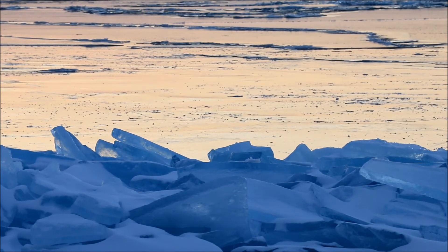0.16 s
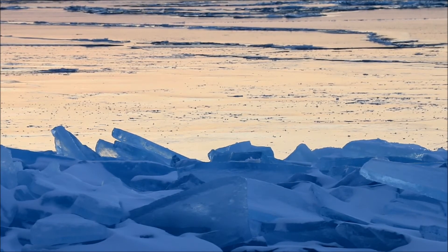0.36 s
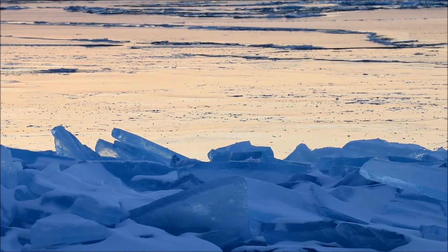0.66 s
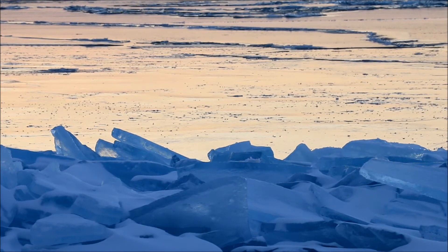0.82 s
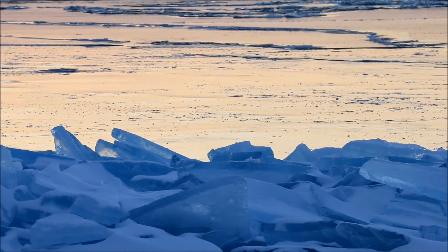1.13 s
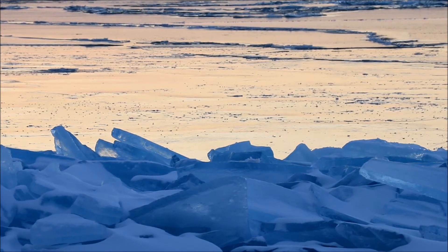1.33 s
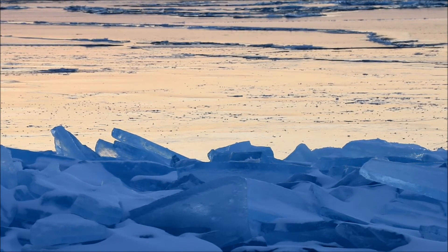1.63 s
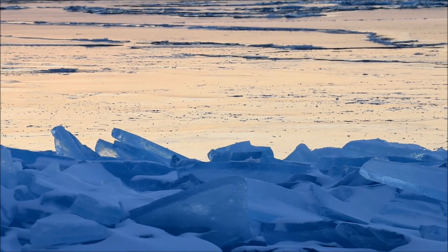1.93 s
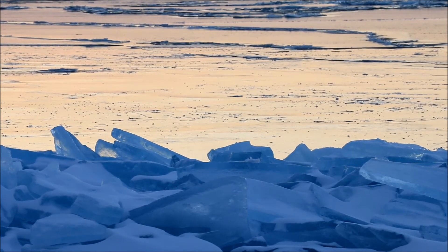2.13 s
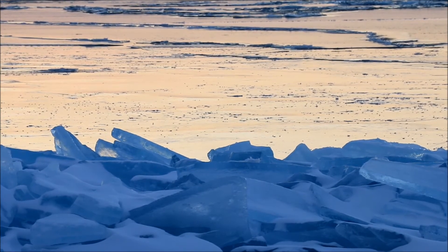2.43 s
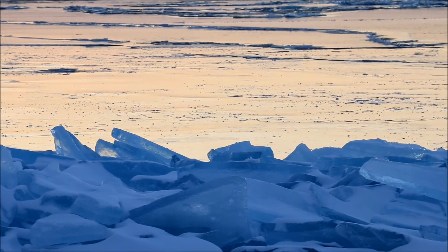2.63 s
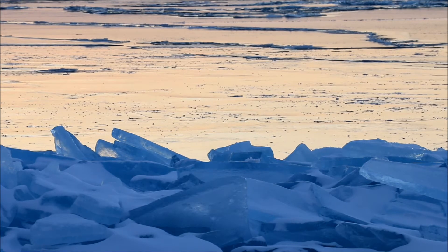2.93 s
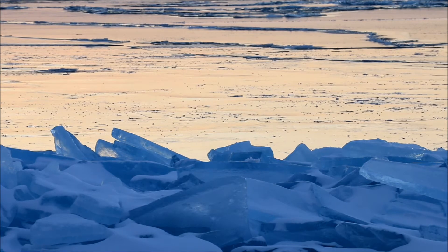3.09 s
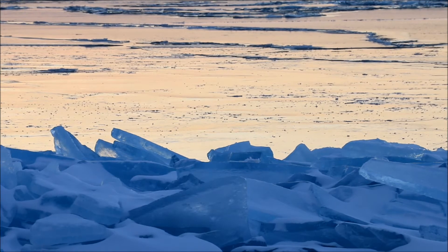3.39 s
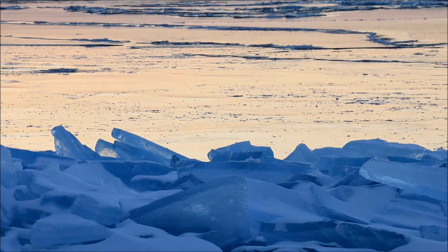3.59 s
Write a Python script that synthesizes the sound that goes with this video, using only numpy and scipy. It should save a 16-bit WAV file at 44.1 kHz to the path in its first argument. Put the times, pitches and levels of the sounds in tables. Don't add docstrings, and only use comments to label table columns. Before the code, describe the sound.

Ice plates grind, moan, knock and tick on a frozen shore under low buffeting wind.

```python
import sys
import numpy as np
from scipy import signal
from scipy.io import wavfile
from scipy.ndimage import uniform_filter1d

SR = 44100
rng = np.random.default_rng(int(sys.argv[2]) if len(sys.argv) > 2 else 0)


def dump_mix(stems):
    frames = np.atleast_2d(stems).T
    limited = np.clip(frames, -1, 1)
    pcm = np.round(limited * 32767).astype(np.int16)
    wavfile.write(sys.argv[1], SR, pcm)


def linear_from_db(decibels):
    return 10 ** (np.asarray(decibels, float) / 20)


N = 165375


def evened(x):
    return x / np.sqrt(np.mean(x ** 2) + 1e-20)


def read(points, hz):
    f, value = np.transpose(points)
    return np.interp(np.log(hz + 1), np.log(f + 1), value)


def curve(rows, column):
    rows = np.array(rows)
    return np.interp(np.arange(N) / SR, rows[:, 0], rows[:, column])


def add(mix, s, sound):
    part = mix[max(round(s * SR), 0):][:len(sound)]
    part += sound[:len(part)]


def resonate(x, hz, width_hz):
    turn = np.exp(2j * np.pi * np.cumsum(hz * np.ones(len(x))) / SR)
    r = np.exp(-np.pi * width_hz / SR)
    return 2 * (turn * signal.lfilter([1 - r], [1, -r], x / turn)).real


def noise(colour, same, patchy_db, size):
    frames, hz = 4 * N // size + 5, np.fft.rfftfreq(size, 1 / SR)
    a, b, c, d, patches = rng.standard_normal((frames, len(hz), 5)).T
    patches = uniform_filter1d(patches, size=10, axis=0)
    patches = evened(uniform_filter1d(patches, size=8, axis=1))
    same = np.clip(read(same, hz), -1, 1)[:, None]
    left, other = a + 1j * b, c + 1j * d
    right = same * left + np.sqrt(1 - same ** 2) * other
    z = np.array([left, right]) * linear_from_db(read(colour, hz)[:, None] + patchy_db * patches)
    return evened(signal.istft(z, nperseg=size, noverlap=3 * size // 4)[1][:, :N])


def ring(hz, t60, rise_s):
    t = np.arange(SR // 4) / SR
    rise = 1 - np.exp(-t / max(rise_s, 1e-5))
    return rise * linear_from_db(-60 * t / max(t60, .002)) * np.sin(2 * np.pi * hz * t)


def burst(t60, low_hz, high_hz):
    t = np.arange(SR // 8) / SR
    wake = 0.15 * rng.standard_normal(len(t)) * linear_from_db(-60 * t / max(t60, .002))
    click = (t == 0)
    grit = signal.lfilter(*signal.butter(3, [low_hz, high_hz], "band", fs=SR), wake + click)
    return grit / abs(grit).max()


# frequency in Hz, level in dB per Hz.
HISS_COLOUR = [(880, -12), (1500, -6.5), (2160, -8.5), (2400, -10), (14200, -13.5), (15700, -13)]


def hiss():
    return linear_from_db(-63.5 + 7.0) * noise(HISS_COLOUR, [(100, 0), (9000, 0.0038)], patchy_db=-0.5, size=1024)


# time in seconds, strength in dB.
GUSTS = [(0.0, -47), (0.09, -46), (0.5, -49), (1.37, -46), (1.7, -43.5), (1.94, -40.5), (2.16, -42.5),
         (2.37, -41), (2.51, -48.5), (2.77, -48), (2.92, -51), (3.02, -48), (3.75, -49.5)]
# frequency in Hz, level in dB per Hz.
BUFFET_COLOUR = [(1, -40), (8, 6), (21, 9), (32, 3.5), (56, -2.5), (110, -38), (300, -140)]
# frequency in Hz, likeness from -1 to 1.
WIND_SAME = [(20, 0.12), (60, 0.66), (130, -0.056), (300, -0.22)]
# frequency in Hz, level in dB per Hz.
FLUTTER_COLOUR = [(40, -13), (70, -2), (200, -13.5), (400, -32), (1500, -140)]
# start in seconds, peak in dB, pitch in Hz, left over right in dB.
PUFFS = [(0.101, -24, 22.3, 14.5), (0.456, -19.5, 21, 11), (0.27, -28, 38, 5), (0.669, -23.5, 21.3, 4.0),
         (0.69, -27, 42, 7), (0.829, -29, 40.7, 12), (1.136, -24.5, 42.4, -5), (1.388, -21, 40.4, 7),
         (1.45, -20.5, 39.4, 6), (1.563, -10.5, 49, 6), (1.587, -17, 22.4, 10), (1.641, -18, 41.7, 6),
         (1.809, -19, 33.5, 12), (1.845, -10.5, 24.5, 6.5), (1.918, -16, 22, 7), (1.959, -19, 26.4, 6),
         (2.029, -13.5, 28.3, 3), (2.238, -14, 23.5, 8), (2.269, -14, 35.4, 7), (2.339, -15.5, 48, 6),
         (2.65, -25, 25.6, 18), (2.73, -26.5, 29.7, 10), (2.989, -22.5, 39.7, 2), (3.04, -25, 35.5, 8),
         (3.079, -31.5, 43.1, -18), (3.299, -28.5, 22.4, 12), (3.709, -24.5, 45.7, 9)]


def wind():
    gust_db = curve(GUSTS, column=1)
    deep = noise(BUFFET_COLOUR, WIND_SAME, patchy_db=2.0, size=4096)
    power = uniform_filter1d((deep ** 2).mean(0), size=6000)
    deep = deep / (power + 0.034) ** 0.67 * linear_from_db([[2.2], [-2.8]])
    flutter = noise(FLUTTER_COLOUR, WIND_SAME, patchy_db=3.0, size=2048) * linear_from_db([[.5], [-.7]])
    puffs = np.zeros((2, N))
    for s, db, hz, pan_db in PUFFS:
        t = np.arange(0, 1.93 / hz, 1 / SR)
        puff = linear_from_db(db - 7.5) * np.hanning(len(t)) * np.sin(2 * np.pi * hz * t)
        add(puffs[0], s - .01, puff * linear_from_db(pan_db / 2))
        add(puffs[1], s - .01, puff * linear_from_db(-pan_db / 2))
    deep_db = -35.0 + 0.69 * (gust_db - gust_db.mean())
    return linear_from_db(deep_db) * deep + linear_from_db(gust_db + 2.5) * flutter + puffs


# start in seconds, peak in dB, pitch in Hz.
THUMPS = [(0.674, -30, 108.6), (0.672, -33.5, 161), (0.676, -39, 237), (1.333, -37, 86), (1.56, -37, 140),
          (1.599, -31, 116), (1.707, -43, 107), (1.94, -33.5, 168), (2.07, -47, 104), (2.426, -31, 86),
          (2.558, -44, 79), (2.72, -38, 105), (2.991, -34.5, 101), (3.023, -26, 149.7), (3.04, -33, 128)]


def thumps():
    out = np.zeros(N)
    for s, db, hz in THUMPS:
        body = ring(hz, 0.16, 0.0032) + 0.38 * ring(hz * 1.507, 0.1, 0.0056)
        add(out, s, linear_from_db(db - 1.5) * body)
    return out * [[1.8], [-.6]]


# time in seconds, level in dB.
ICE_PRESSURE = [
    (0.0, -47),
    (0.36, -49),
    (0.63, -48),
    (0.75, -42.5),
    (1.14, -51),
    (2.03, -50.5),
    (2.7, -51),
    (2.84, -47),
    (3.24, -50.5),
    (3.75, -50.5),
]
# frequency in Hz, level in dB per Hz.
RUB_COLOUR = [(150, -14), (260, -8), (416, -6), (528, -2), (1030, -14), (1350, -15.5), (2390, -28.5),
              (4000, -35.5), (5200, -92), (8800, -120)]


def grind():
    rub = noise(RUB_COLOUR, [(300, 0.89), (640, 0.72), (1100, 0.77), (3000, 0.2)], patchy_db=2.0, size=1024)
    hollow = evened(resonate(rng.standard_normal(N), hz=560, width_hz=101))
    nudges_per_s, nudge_t60_s = 400, 0.082
    chance, strike, pick = rng.random((3, N))
    hits = linear_from_db(-4.5 * np.log(chance + 0.04)) * (strike < nudges_per_s / SR)
    which = (pick * 12).astype(int)
    nudges = np.zeros(N)
    for k, hz in enumerate(np.geomspace(380, 1500, num=12)):
        tap = ring(hz, nudge_t60_s * 500 / hz, 0.00027) * 500 / hz
        nudges += signal.oaconvolve(hits * (which == k), tap)[:N]
    db = curve(ICE_PRESSURE, column=1)
    rub_db = -0.5 + db.mean() + 0.54 * (db - db.mean())
    return linear_from_db(rub_db) * rub + linear_from_db(db - 8.5) * hollow + linear_from_db(db - 13) * evened(nudges)


# time in seconds, level in dB, pitch in Hz.
MOAN_NOTE = [
    (0., -43.5, 592),
    (.16, -58, 645),
    (.3, -50, 639),
    (.42, -48, 626),
    (.49, -51.5, 599),
    (.6, -38.5, 601),
    (.71, -56, 585),
    (.76, -45.5, 527),
    (.82, -46, 516),
]


def moan():
    hz, t, width_hz = curve(MOAN_NOTE, column=2), np.arange(N) / SR, 21
    note = resonate(rng.standard_normal(N), hz, width_hz)
    note = resonate(note, hz, 2.0 * width_hz)
    note = note / (uniform_filter1d(evened(note) ** 2, size=600) + 0.046) ** 0.35
    slip_db = 1.9 * evened(uniform_filter1d(rng.standard_normal(N), size=1500))
    rest_db = -180 * np.maximum(t - MOAN_NOTE[-1][0], 0)
    return linear_from_db(curve(MOAN_NOTE, column=1) - 4 + slip_db + rest_db) * evened(note)


# middle in seconds, length in seconds, level in dB, pitch in Hz, width in Hz.
SCRAPES = [(.005, 0.014, -45, 860, 880), (0.64, .1, -50, 551, 25), (0.788, 0.04, -54.5, 1720, 400),
           (0.858, 0.044, -45, 642, 69.6), (1.022, 0.094, -48, 625, 70), (1.168, 0.045, -44.5, 630, 60.3),
           (1.578, 0.05, -46, 745, 160), (1.654, .05, -52, 690, 200), (1.679, 0.11, -50.5, 374, 200),
           (2.384, 0.12, -50, 362, 200), (2.315, 0.062, -58, 1510, 500), (2.382, 0.098, -52.5, 670, 490),
           (2.732, .015, -44.5, 720, 502), (2.825, 0.047, -47.5, 503, 120), (2.83, 0.022, -50, 950, 200),
           (1.871, 0.052, -51, 584, 80), (2.892, 0.069, -49.5, 425, 60), (2.938, 0.099, -49, 720, 300),
           (2.971, 0.26, -60, 1640, 500)]


def scrapes():
    out = np.zeros(N)
    for s, length, db, hz, width_hz in SCRAPES:
        n = round(2 * length * SR)
        grain, grip = rng.standard_normal((2, n + 2000))
        rough = grain * linear_from_db(2.6 * evened(uniform_filter1d(grip, size=200)))
        slide = resonate(resonate(rough, hz, width_hz), hz, width_hz)
        slide = evened(slide[-n:])
        slide = evened(slide / (uniform_filter1d(slide ** 2, size=500) + .1) ** 0.35)
        add(out, s - length, linear_from_db(db) * np.hanning(n) * slide)
    return out


# start in seconds, peak in dB, click colour in Hz, snap in dB over the peak.
TICKS = [(0.0044, -35, 1700, -9), (0.3072, -32, 1700, -12), (0.3932, -31.5, 2500, -7),
         (0.4290, -38, 1700, -22), (0.434, -34, 3600, -20), (0.5083, -29.5, 2970, -26),
         (0.544, -42, 2400, -18), (0.5757, -26, 3280, -15), (0.614, -41, 3000, -8),
         (0.65, -34.5, 1800, -22), (0.662, -29.5, 3940, -15), (0.8074, -29, 2860, -28),
         (0.837, -27.5, 3220, -19.5), (1.538, -44, 2000, -11), (1.942, -34, 1810, -15),
         (2.7963, -32, 2260, -25), (2.935, -35, 2520, -16), (2.979, -40, 2300, -19),
         (3.2993, -35, 2380, -26), (3.3397, -44, 2530, -15)]


def ticks():
    out = np.zeros(N)
    for s, db, hz, snap_db in TICKS:
        add(out, s, linear_from_db(db - 9.5) * burst(0.016, low_hz=900, high_hz=hz))
        add(out, s, linear_from_db(db - 19.0) * ring(hz, 0.01, 0.00042))
        add(out, s, linear_from_db(db + snap_db + 2.5) * burst(0.012, low_hz=3360, high_hz=12300))
    return out


# start in seconds, peak in dB, pitch in Hz.
BUMPS = [(0.039, -45, 620), (0.2, -35, 623), (0.221, -36, 512), (0.259, -36, 628), (0.422, -30.5, 633),
         (0.533, -34, 577), (0.629, -40, 560), (0.746, -38, 564), (0.835, -35, 620), (0.957, -32, 598),
         (0.993, -44, 636), (1.221, -39, 467), (1.422, -35, 547), (1.504, -38.5, 535), (1.689, -38, 506),
         (1.719, -42, 687), (1.847, -45, 616), (1.886, -39, 340), (1.987, -37, 613), (2.02, -42, 543),
         (2.289, -35, 475), (2.361, -37, 327), (2.639, -34, 590), (2.767, -29, 600), (2.809, -29.5, 518),
         (2.901, -34, 433), (3.022, -36.5, 409), (3.092, -40.5, 611), (3.179, -40, 553), (3.228, -37, 558),
         (3.441, -37, 466), (3.603, -45, 360), (3.641, -38, 528), (3.721, -45, 466)]


def bumps():
    out = np.zeros(N)
    for s, db, hz in BUMPS:
        add(out, s, linear_from_db(db - 5) * ring(hz, t60=0.088, rise_s=0.0026))
    return out


# start in seconds, peak in dB, pitch in Hz, fade time (t60) in seconds,
# crack in dB over the peak.
KNOCKS = [(0.075, -25.5, 358, 0.09, -18), (0.6605, -29, 503, 0.06, -24), (0.774, -27.5, 517, 0.071, -18),
          (0.914, -26.5, 657, 0.089, -22), (1.538, -33.5, 620, 0.039, -8.5), (1.539, -39, 990, 0.03, -9),
          (1.553, -25, 470, 0.083, -31), (1.613, -22.5, 650, 0.094, -17), (1.649, -40, 730, 0.058, -26),
          (1.941, -28.5, 375, 0.083, -23), (2.306, -26, 396, 0.063, -18), (2.688, -44, 560, 0.25, -8),
          (2.72, -21, 525, 0.051, -15.5), (2.722, -30.5, 970, 0.062, -32), (2.793, -36, 640, 0.05, -7),
          (2.8, -34.5, 747, 0.13, -20), (2.941, -50, 492, 0.031, -10)]
# multiple of its pitch, level in dB, share of its fade time.
SLAB_TONES = [
    (1.001, 4, 0.45),
    (1.22, -11, 0.82),
    (1.6, -7, 0.45),
]


def knocks():
    out = np.zeros(N)
    for s, db, hz, t60, crack_db in KNOCKS:
        for multiple, tone_db, share in SLAB_TONES:
            add(out, s, linear_from_db(db - 2.5 + tone_db) * ring(hz * multiple, t60 * share, 0.0027))
        add(out, s, linear_from_db(db + crack_db + 8.0) * burst(0.03, 0.96 * hz, 1.615 * hz))
    return out


def echoes(x):
    t = np.arange(SR // 5) / SR
    signs = rng.choice([-1., 1.], (2, len(t)))
    present = rng.random((2, len(t))) < 1500 / SR
    taps = signs * present * linear_from_db(-60 * t / 0.21) * (t > .004)
    return signal.fftconvolve(x[None], taps / np.linalg.norm(taps[0]), axes=1)[:, :N]


def scene():
    air = wind() + thumps()
    plates, slides = grind() + moan(), scrapes()
    high, low = ticks(), knocks() + bumps()
    ice = plates * linear_from_db([[1.8], [-2.1]]) + slides * linear_from_db([[2.1], [-2.6]])
    ice = ice + high * linear_from_db([[2.8], [-3.8]]) + low * linear_from_db([[1.4], [-1.7]])
    return air + ice + linear_from_db(-11.0) * echoes(low + high + slides)


def roll_off(x):
    return signal.sosfilt(signal.butter(12, 15770, fs=SR, output="sos"), x)


def record(dry):
    return roll_off(dry + hiss())


dry = scene()
out = record(dry)
dump_mix(out)
```